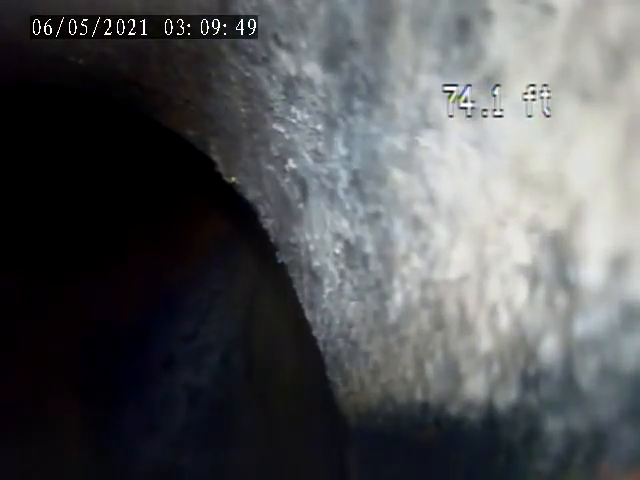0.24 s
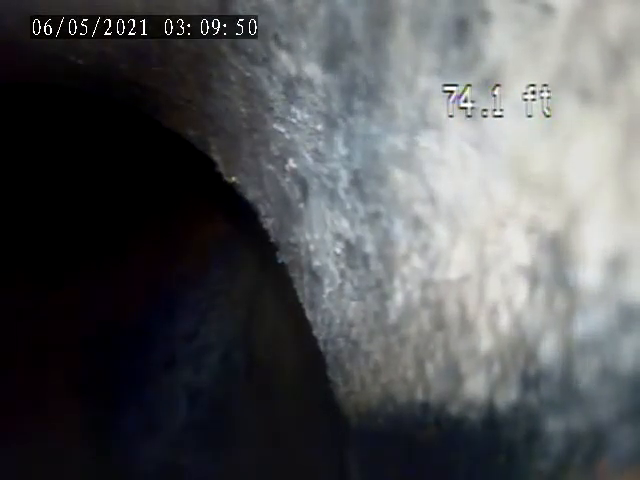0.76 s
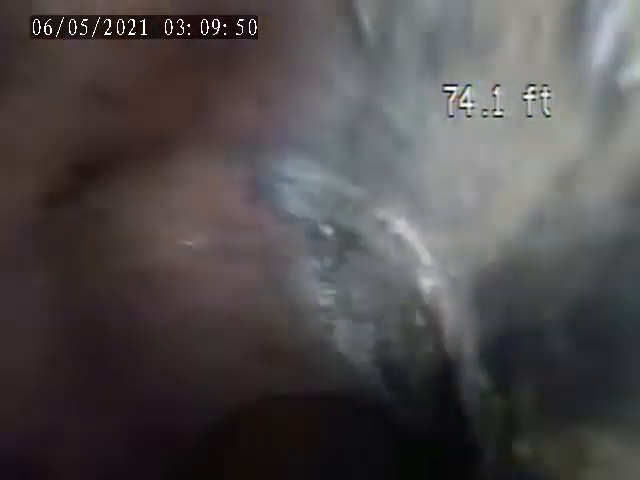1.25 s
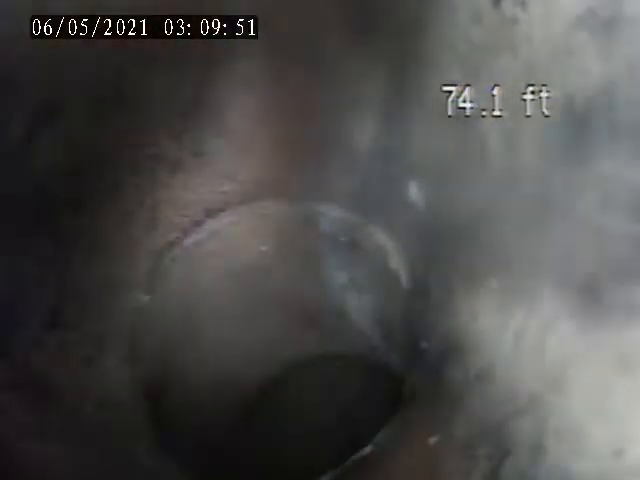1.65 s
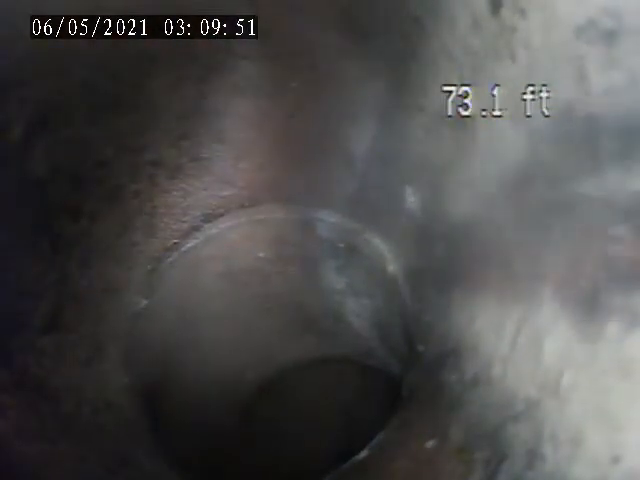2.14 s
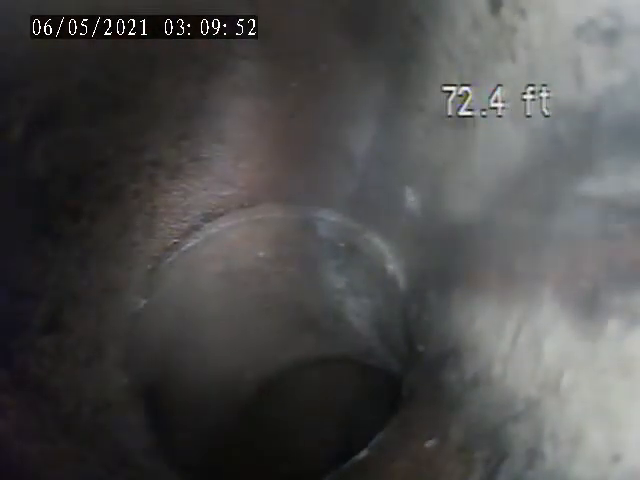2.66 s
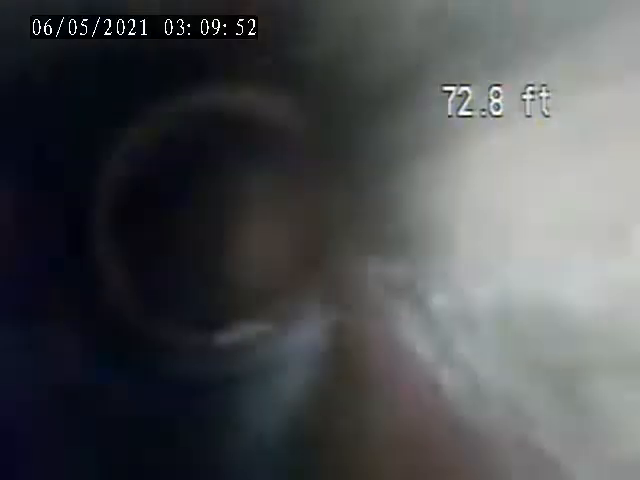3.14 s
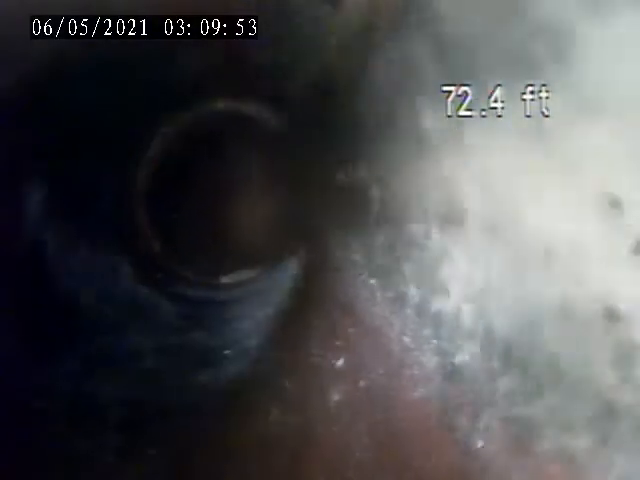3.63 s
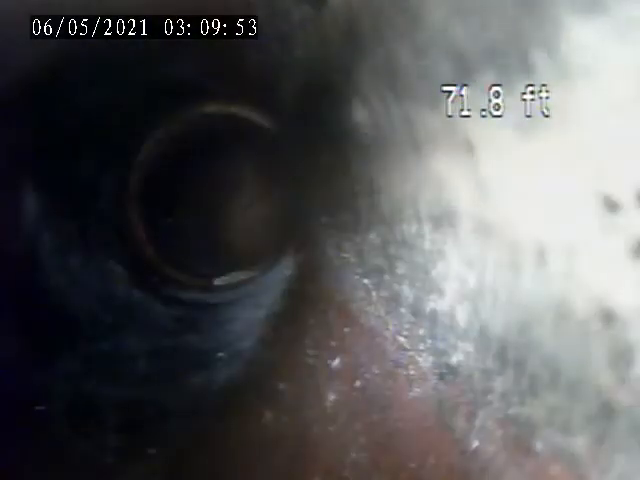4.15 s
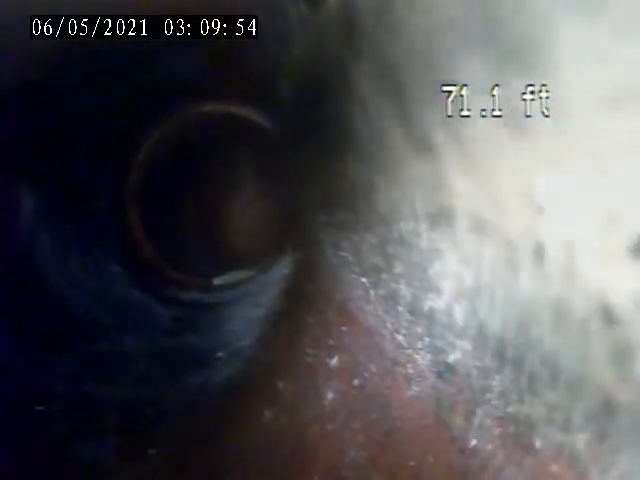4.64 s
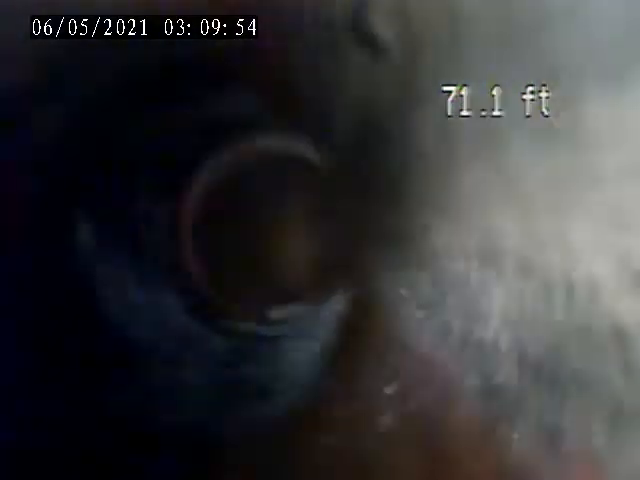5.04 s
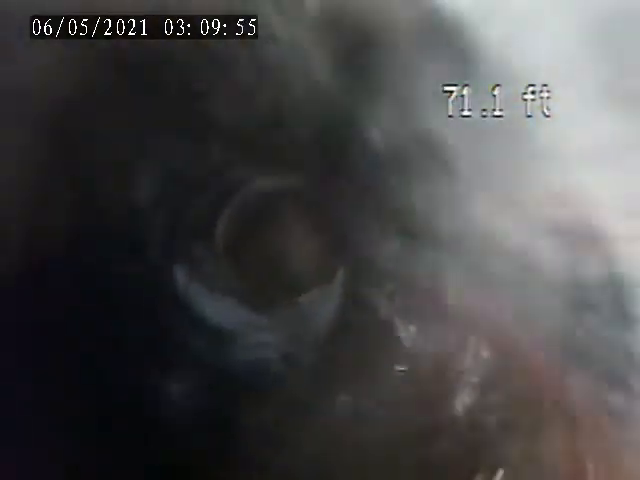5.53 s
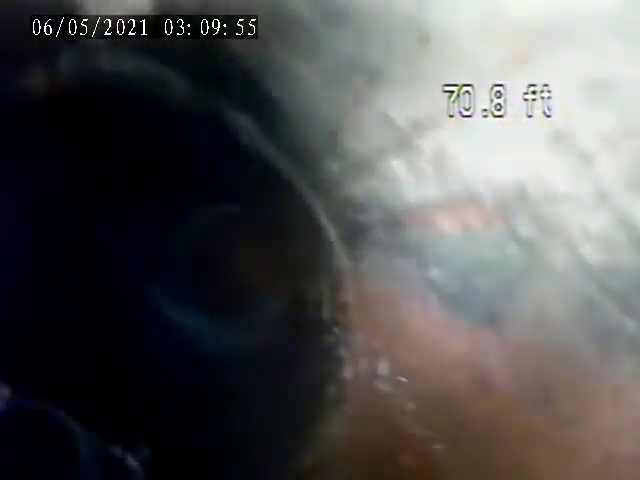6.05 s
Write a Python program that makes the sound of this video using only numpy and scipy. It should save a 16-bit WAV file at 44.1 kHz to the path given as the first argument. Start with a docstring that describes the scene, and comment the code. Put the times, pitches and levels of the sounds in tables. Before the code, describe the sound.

A narrow, telephone-like microphone on the equipment itself carries steady hiss and a faint low hum throughout. At about 0.25 s a heavy bump of several rapid blows hits the case, booming and clipping, with a short clatter. From 0.42 to 0.75 s a rough rub swells across the case, with a low shudder, ending in a hard knock at 0.73 and a weaker one at 0.8. Another sharp knock comes at 1.13 and a duller one at 1.56, with reel ticks at 0.8, 1.64 and 1.9. Thin, bright cable swishes rise around 0.8 and 2.6, with tiny rattles between. At 2.96 a loud, bright snag snaps and shivers away. Faint taps and slides follow, with a tick near 4.0. From 4.5 the reel rolls in a soft, low rush, with ticks, rattles, muffled thuds around 4.7 and 5.0 to 5.5, and repeated swishes, strongest near 5.4, easing towards the end at about 6.4.

```python
"""First comes a heavy bump on the case, a quarter second into steady hiss and hum, then a rub and a few knocks.
Place: a sewer camera's push cable is pulled back out of a pipe. Microphone: the monitor's own, narrow in band.
The blows ring damped modes with noisy tails; rub, cable and rolling reel are coloured noise of many tiny slips.
The cable slides in strokes and rattles in its guide; the reel ticks and thuds softly. The hardest blows clip."""
import sys
import numpy as np
from scipy import signal
from scipy.fft import rfft, irfft, next_fast_len
from scipy.io import wavfile

SR = 44100
rng = np.random.default_rng(int(sys.argv[2]) if len(sys.argv) > 2 else 0)


def pcm_store(signal):
    """Save signal as 16-bit PCM."""
    levels = np.round(np.clip(np.atleast_2d(signal), -1, 1) * 32767)
    wavfile.write(sys.argv[1], SR, levels.astype(np.int16).T)


N = 277389
T = np.arange(N) / SR


def undb(db):
    """Decibels to gain."""
    return 10 ** (np.asarray(db) / 20)


def unit(x):
    """Scale to rms 1."""
    return x / np.sqrt(np.mean(x ** 2))


def peak_unit(x):
    """Scale to peak 1."""
    return x / np.abs(x).max()


def colour(x, points):
    """Filter by a spectrum of (f/Hz, level/dB) points, joined by straight lines over log frequency."""
    hz, db = np.transpose(points)
    size = next_fast_len(len(x) + 2048)
    f = np.maximum(np.arange(size // 2 + 1) * SR / size, 1)
    gain = undb(np.interp(np.log(f), np.log(hz), db))
    return irfft(rfft(x, size) * gain, size)[:len(x)]


def walk(rate):
    """Slow chance with a spread near 1: random knots, so many a second, joined by straight lines."""
    knots = rng.standard_normal(int(N / SR * rate) + 2)
    return np.interp(T * rate, np.arange(len(knots)), knots)


def wavering_sine(hz, waver, rate):
    """Sine whose pitch wanders by a fraction of itself."""
    return np.sin(2 * np.pi * np.cumsum(hz * (1 + waver * walk(rate))) / SR)


def grains(rate, spread_db):
    """Tiny slips at random moments, so many a second on average, and of uneven size."""
    happens = rng.random(N) < rate / SR
    return happens * rng.standard_normal(N) * undb(spread_db * rng.standard_normal(N))


def fade(t, t60):
    """Exponential decay by 60 dB in t60 seconds."""
    return np.exp(-np.log(1000) * t / t60)


def swell(s, rise_db_per_s, fall_db_per_s):
    """Gain that climbs to 1 at a moment and dies away."""
    return undb(np.minimum((T - s) * rise_db_per_s, (s - T) * fall_db_per_s))


def ring(modes, seconds):
    """Response of damped modes to one blow, in alternating polarity."""
    t = T[:int(seconds * SR)]
    out = np.zeros(len(t))
    for k, (hz, db, t60) in enumerate(modes):
        out += (-1) ** k * undb(db) * np.sin(2 * np.pi * hz * t) * fade(t, t60)
    return out


def tail(t, db, t60):
    """Dense, noisy ring of many weak modes, as noise in the channel's band."""
    return undb(db) * unit(colour(rng.standard_normal(len(t)), CHANNEL)) * fade(t, t60)


def add(out, s, sound):
    """Mix a sound in at a time."""
    i = int(s * SR)
    out[i:i + len(sound)] += sound[:N - i]


# spectrum of the hiss: (f/Hz, level/dB)
HISS_COLOUR = [(15, -23.5), (25, -6.5), (32, -28.5), (64, -15.5), (145, -17), (248, -23), (288, -18.5),
               (389, -27.5), (560, -25.5), (610, -29), (859, -30), (2350, -35.5), (2860, -31.5),
               (4200, -41), (5460, -78.5), (9240, -120)]
# tones of the hum: (f/Hz, level/dB)
HUM = [(61, -55.5), (120, -65.5), (170, -62), (285, -71.5)]


def floor(hiss_db=-49):
    """Steady hiss of coloured noise with a hum of tones that waver in pitch."""
    hum = sum(undb(db) * np.sqrt(2) * wavering_sine(hz, 0.03856, 22) for hz, db in HUM)
    return undb(hiss_db) * unit(colour(rng.standard_normal(N), HISS_COLOUR)) + hum


# spectrum of the rolling drum: (f/Hz, level/dB)
ROLL_COLOUR = [(59, -49.5), (100, -24.5), (184, 1), (304, -9.5), (396, -10), (428, -12.5), (559, -9.5),
               (800, -19), (2710, -22), (3120, -25.5), (4200, -43), (5460, -72.5), (9240, -120)]
# soft thuds and groans of the turning reel: (middle t/s, pitch f/Hz, level/dB, length t/s)
THUDS = [(3.46, 510, -49, .13), (3.79, 526, -48, 0.27), (4.66, 185, -35.5, 0.1), (5.05, 189, -39.5, .11),
         (5.285, 186, -34.5, 0.077), (5.40, 182, -35.5, 0.0723), (5.52, 191, -42, .11),
         (6.19, 195, -55, 0.12)]


def reel(start_s=4.5, spin_up_s=0.12, roll_db=-47.5, idle_db=-69, uneven_db=0.4):
    """The drum spins up late and rolls with a soft rush; settling coils swell and die at its low resonances."""
    rolling = undb(np.interp(T, [start_s, start_s + spin_up_s], [idle_db, roll_db]))
    rush = unit(colour(grains(6000, spread_db=3), ROLL_COLOUR))
    out = rush * rolling * undb(uneven_db * walk(25))
    for s, hz, db, length in THUDS:
        window = np.hanning(int(length * SR))
        thud = wavering_sine(hz, 0.081, 70)[:len(window)]
        add(out, s - length / 2, undb(db) * window * thud)
    return out


# ticks of the reel: (t/s, level/dB)
TICKS = [(0.824, -28.5), (1.642, -24), (1.917, -30.5), (3.986, -26.5), (4.449, -29.5), (4.606, -30),
         (4.763, -36.5), (5.395, -32)]
# what the reel's catch rings with: (f/Hz, level/dB, t60/s)
CATCH_MODES = [(679, -16.5, 0.14), (1200, -9.5, 0.051), (1423, -6, 0.03), (1530, 0.5, 0.015),
               (2613, -1.5, 0.058), (2825, -9.5, 0.088), (3540, -26, 0.016)]


def ticks(bounce_s=0.0081, bounce_db=-7):
    """The catch snaps over, rings in its modes with noisy tails, and bounces once."""
    out, catch = np.zeros(N), peak_unit(ring(CATCH_MODES, 0.19))
    t = T[:len(catch)]
    for s, db in TICKS:
        tails = tail(t, db=-8.0, t60=.03) + tail(t, db=-17.5, t60=0.2)
        add(out, s, undb(db) * (catch + tails))
        # each bounce comes a little sooner than bounce_s
        add(out, s + bounce_s * rng.uniform(0.954, 0.99), undb(db + bounce_db) * catch)
    return out


# the cable rattles in its guide: (t/s, level/dB, burst length t/s)
RATTLES = [(0.454, -34, 0.022), (1.023, -36, 0.0081), (1.356, -41, 0.0035), (1.406, -39.5, 0.039),
           (2.163, -43, 0.0042), (2.213, -32, 0.003), (2.413, -28.5, 0.0077), (2.9619, -7.5, 0.0059),
           (3.614, -38, 0.0067), (4.215, -33.5, 0.0029), (4.589, -31, 0.0055), (4.675, -27, 0.0036)]
# spectrum of the rattling guide: (f/Hz, level/dB)
RATTLE_COLOUR = [(60, -27), (170, -9.5), (400, -5.5), (700, -14), (1100, -6), (1400, -10.5), (1850, -3),
                 (2500, -3), (3100, 2), (3550, -1), (4200, -6)]


def rattles(shiver_db=-10.793, shiver_t60=0.22, snap_db=1, peak_limit=.9):
    """A bright burst of noise as the cable snags, then the guide shivers."""
    burst, shiver = np.zeros(N), np.zeros(N)
    t = T[:SR // 2]
    for s, db, length in RATTLES:
        add(burst, s, undb(db) * np.exp(-(t / length) ** 4))
        add(shiver, s, undb(db + shiver_db) * fade(t, shiver_t60))
    guide = unit(colour(rng.standard_normal(N), RATTLE_COLOUR))
    snap = unit(colour(rng.standard_normal(N), SLIDE_COLOUR))
    snag = (0.55 * burst + shiver) * guide + undb(snap_db) * burst * snap
    # soft limit that rounds the loudest peaks of the rattle
    return peak_limit * np.tanh(snag / peak_limit)


# spectrum of the sliding cable, for a swish at SLIDE_HZ: (f/Hz, level/dB)
SLIDE_COLOUR = [(900, -32.5), (1700, -28.5), (2300, -16), (2900, -1), (3450, 6), (3900, 5.5), (4400, -3)]
SLIDE_HZ = 3507
# the coarser sound of a hard pull: (f/Hz, level/dB)
GRIND_COLOUR = [(700, -27.5), (1600, -17), (2200, -7), (2800, -4.5), (3500, -17), (4400, -11.5)]
# pulls: (greatest speed t/s, level/dB, length t/s, swish pitch f/Hz, grind against swish level/dB)
PULLS = [(0.822, -40.5, 0.6, 3660, -8), (1.903, -50, .5, 3030, -10), (2.572, -31.5, 0.31, 3540, -10.5),
         (2.68, -39, 0.31, 3860, -21), (2.95, -38, 0.32, 3640, -6), (3.496, -52, 0.2, 3520, 0),
         (3.672, -49, .25, 3500, 4), (4.288, -43, 0.24, 3060, -9.5), (4.559, -39.5, 0.21, 3490, -5.5),
         (4.664, -40.5, 0.3, 3600, 6.5), (4.815, -38.5, 0.069, 3650, -18), (4.982, -41.5, 0.45, 3500, -8),
         (5.381, -34, 0.15, 3730, -14), (5.5, -41, 0.53, 3750, -16)]


def cable(rise_db=49, fall_db=45, creep_db=-59, grind_growth=0.71, uneven_db=2.0, focus_db=4, focus_width_hz=300):
    """The rod swishes through its guide with each pull, at its own pitch and share of grind, over a steady creep."""
    slips = grains(5000, spread_db=1.0)
    grind = unit(colour(grains(2500, spread_db=4.0), GRIND_COLOUR))
    out = undb(creep_db) * unit(colour(slips, SLIDE_COLOUR))
    for s, db, length, hz, grind_db in PULLS:
        # rise_db is gained over one length, fall_db lost over one
        speed = swell(s, rise_db / length, fall_db / length)
        swish = colour(slips, [(f * hz / SLIDE_HZ, level) for f, level in SLIDE_COLOUR])
        focus = [(hz - focus_width_hz, 0), (hz, focus_db), (hz + focus_width_hz, 0)]
        swish = unit(colour(swish, focus))
        out += undb(db) * (speed * swish + undb(grind_db) * speed ** grind_growth * grind)
    return out * undb(uneven_db * walk(52))


def rocking(jolt_s=0.37, jolt_db=-28.5, rub_s=0.611, rub_db=-20, release_s=.725, shudder_db=-19, drag_db=-27):
    """The case rocks on its feet after the bump, trembles as the rub drives it, and shudders as it lets go."""
    rock = np.sqrt(2) * wavering_sine(37.8, 0.11, 14)
    shudder = wavering_sine(76, 0.23, 50)
    jolted = swell(jolt_s, rise_db_per_s=495, fall_db_per_s=32.5) * (T < rub_s)
    driven = swell(rub_s, rise_db_per_s=81.5, fall_db_per_s=80) * (T > jolt_s)
    release = swell(release_s, rise_db_per_s=198, fall_db_per_s=312.5)
    sway = np.maximum(undb(jolt_db) * jolted, undb(rub_db) * driven)
    tremble = undb(shudder_db) * release + undb(drag_db) * driven ** 2
    return rock * sway + shudder * tremble


# spectrum of the rub over the case: (f/Hz, level/dB)
RUB_COLOUR = [(53, -27.5), (90, -3.5), (402, -4), (600, -4.5), (728, -4), (1110, -16), (1600, -14),
              (2320, -18), (3140, -15.5), (3580, -15.5), (4200, -25.5), (5460, -44), (9240, -120)]


def rub(start_s=0.42, end_s=0.75, scrape_db=-19, body_db=-18.0, split_hz=1000, uneven_db=4.5, peak_limit=.45):
    """One stroke drags over the case: dense slips, bright at the contact, dull in the walls, growing with speed."""
    slips = colour(grains(9000, spread_db=3.5), RUB_COLOUR)
    body = signal.sosfiltfilt(signal.butter(3, split_hz, fs=SR, output="sos"), slips)
    speed = np.abs(np.sin(np.pi * np.clip((T - start_s) / (end_s - start_s), 0, 1)))
    scrape = undb(scrape_db) * unit(slips - body) * speed ** 2.66
    drag = scrape + undb(body_db) * unit(body) * speed ** 1.48
    # soft limit that rounds the tallest peaks of the rub noise
    return peak_limit * np.tanh(drag * undb(uneven_db * walk(110)) / peak_limit)


# sharp knocks on the panel: (t/s, level/dB, contact t/ms, chatter 0-1)
KNOCKS = [(.7265, -4, .045, 0.3), (0.8013, -14, 0.012, 0.4), (1.1278, -8.5, 0.06, 0.02),
          (1.5559, -18, 0.13, 0.03), (3.2327, -32, 0.72, 0.06), (3.427, -37, 0.22, 0.2)]
# what the panel rings with: (f/Hz, level/dB, t60/s)
PANEL_MODES = [(412, -11, 0.028), (540, -13, 0.033), (789, -17.5, 0.069), (986, -4, 0.02),
               (1490, -7.5, 0.0075), (2040, -4, 0.025), (1990, -6.5, 0.025), (2800, -5, 0.023),
               (3073, 3.5, 0.0079), (3480, 1.5, 0.0057)]


def knocks(bounce_s=0.0012, crack_db=-2, crack_hz=2300):
    """Hard, short contacts on the panel: a crack, then its ring; a longer contact is duller, some chatter."""
    out, panel = np.zeros(N), peak_unit(ring(PANEL_MODES, 0.57))
    t = T[:len(panel)]
    # the crack is two cycles long
    crack = np.sin(2 * np.pi * crack_hz * t) * (t < 2 / crack_hz)
    panel = panel + undb(crack_db) * crack
    for s, db, contact_ms, chatter in KNOCKS:
        # one-pole low-pass with the contact as its time constant
        blow = peak_unit(signal.lfilter([1], [1, -np.exp(-1000 / (contact_ms * SR))], panel))
        add(out, s, undb(db) * (blow + tail(t, db=-22.0, t60=0.13)))
        add(out, s + bounce_s, undb(db) * chatter * blow)
    return out


# blows of one heavy bump on the case: (t/s, level/dB)
BUMPS = [(.2450, -17.5), (0.2494, 4), (0.2594, 10), (0.2676, 4.5), (0.284, -8.5)]
# what the whole case rings with: (f/Hz, level/dB, t60/s)
CASE_MODES = [(68.3, -2, 0.24), (118.3, -8.5, 0.099), (163, -9, 0.13), (226.7, -4.5, .12), (320, 1.5, .075),
              (464, -4, 0.083), (612, 0, 0.039), (776, 1.5, 0.031), (977, -2, 0.019), (1370, -13.5, .04),
              (1610, -24.5, 0.1), (2190, -16, .04), (2630, -23.5, 0.046)]


def bump(bounce_s=0.028, bounce_db=-24):
    """The case is jolted and rings; loose parts clatter as noisy tails, and it settles in a few weak hops."""
    out, body = np.zeros(N), peak_unit(ring(CASE_MODES, 1))
    t = T[:SR]
    for s, db in BUMPS:
        clatter = tail(t, db=-22.5, t60=0.15) + tail(t, db=-52, t60=0.94)
        add(out, s, undb(db) * (body + clatter))
    last_blow_s = BUMPS[-1][0]
    for k, chance in enumerate(rng.random(size=3)):
        add(out, last_blow_s + bounce_s * (k + .5 + chance), undb(bounce_db - 1.7 * k) * body)
    return out


def scene():
    """Everything reaches the one microphone."""
    blows = bump() + rub() + rocking() + knocks()
    return (blows + ticks() + rattles() + cable() + reel() + floor())[None]


# pass band of the monitor's audio channel: (f/Hz, level/dB)
CHANNEL = [(20, 0), (3500, 1), (3850, -4.5), (4200, -10), (4500, -24.5), (4900, -76)]


def record(dry, offset=-.089, clip_level=.705, top_hz=16000):
    """A telephone-wide channel with a steady offset, clipped at full level, then low-passed."""
    clipped = np.clip(colour(dry[0], CHANNEL) + offset, -clip_level, clip_level)
    top = signal.ellip(9, .1, 70, top_hz, fs=SR, output="sos")
    # the offset bypasses the filter, so that it is steady from the first sample
    return (signal.sosfilt(top, clipped - offset) + offset)[None]


dry = scene()
out = record(dry)
pcm_store(out)
```